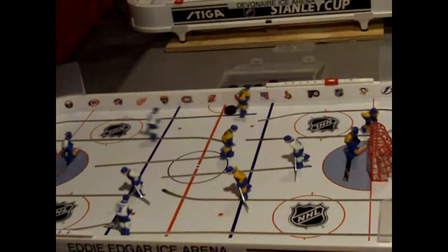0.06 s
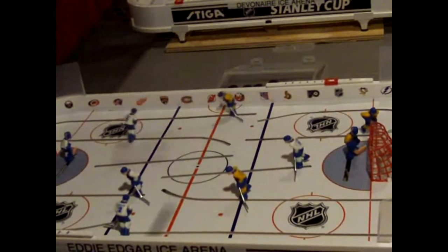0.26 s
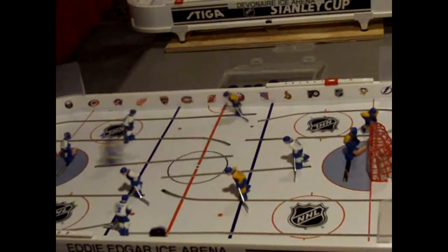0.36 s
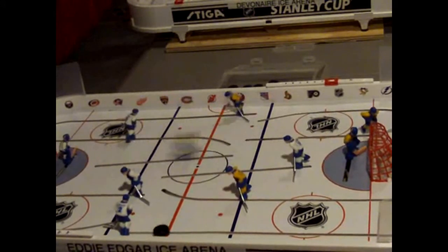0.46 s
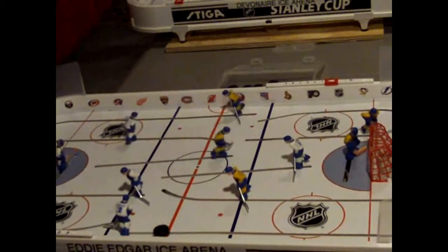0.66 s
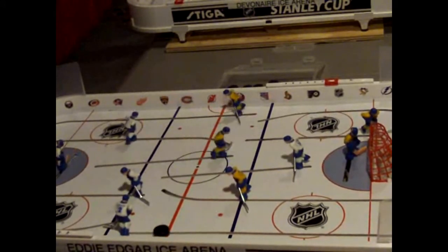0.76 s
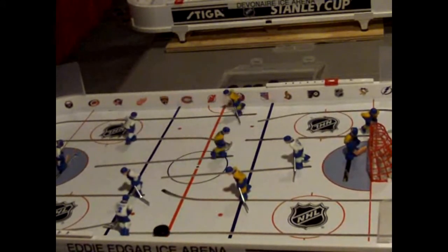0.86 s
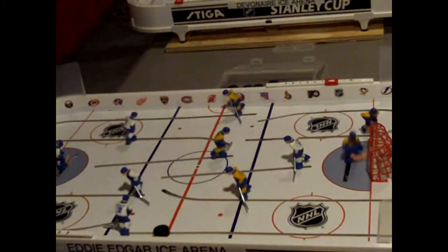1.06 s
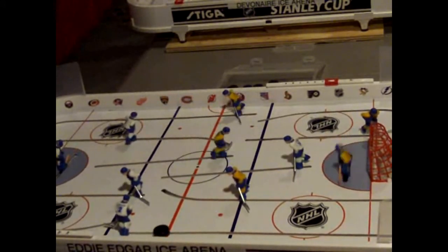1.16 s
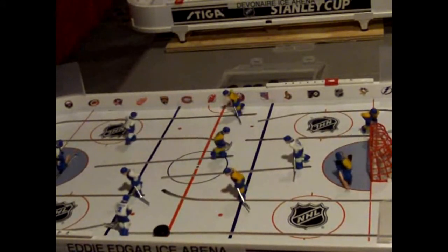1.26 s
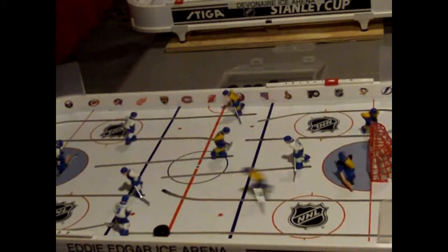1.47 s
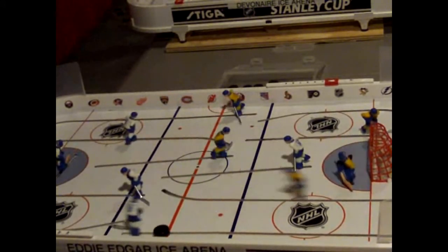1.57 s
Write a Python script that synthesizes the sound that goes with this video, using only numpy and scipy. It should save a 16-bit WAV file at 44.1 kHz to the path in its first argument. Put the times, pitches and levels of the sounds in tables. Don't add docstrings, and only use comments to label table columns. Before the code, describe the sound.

Hollow plastic knocks and rattling rods of a table hockey game build to an overloaded slam, then lighter ticks, another firm clatter and later clacks, with short indoor reverberation, soft hiss and thin, faint whine.

```python
import sys
import numpy as np
from scipy import signal
from scipy.fft import rfft, irfft
from scipy.io import wavfile

SR = 44100
rng = np.random.default_rng(int(sys.argv[2]) if len(sys.argv) > 2 else 0)


def decibels_to_gain(level_db):
    exponent = np.asarray(level_db, float) / 20
    return 10 ** exponent


def unload_wav(signal):
    wavfile.write(
        sys.argv[1],
        SR,
        np.round(np.clip(np.atleast_2d(signal).T, -1, 1) * 32767).astype(np.int16),
    )


N = 70560

# start in seconds, peak in dB, length of the drive in seconds.
SLAM = (.3121, 2.0, .009)


def rms_one(x):
    return x / np.sqrt(np.mean(x ** 2) + 1e-20)


def at_hz(points, hz):
    point_hz, point_db = np.transpose(points)
    return np.interp(np.log(hz), np.log(point_hz), point_db)


def ringing(hz, db, t60, phase, size):
    t = np.arange(size) / SR
    decay = np.exp(-np.log(1000) * t / t60[:, None])
    waves = np.sin(2 * np.pi * hz[:, None] * t + phase[:, None])
    return (decibels_to_gain(db)[:, None] * decay * waves).sum(axis=0)


def rink(treble_db, bass_db, count=56, size=4000):
    # frequency in Hz, level in dB.
    rink_colour = [(150, -63), (250, -39), (450, -8), (1410, -2.5), (2570, -7), (3060, -13), (4550, -19),
                   (9560, -30), (15500, -45)]
    treble_hz, bass_hz = 4000, 800
    ring_s_at_1k, ring_slope, mode_spread_db = 0.097, 0.37, 3.5
    shell_hz, shell_t60_s, shell_db = 3294, 0.028, -0.3

    def colour(hz):
        treble = treble_db / (1 + (treble_hz / hz) ** 2)
        bass = bass_db / (1 + (hz / bass_hz) ** 2)
        return at_hz(rink_colour, hz) + treble + bass

    hz = 400 + (np.arange(count) + rng.random(count)) * shell_hz / count
    t60 = ring_s_at_1k * (1000 / hz) ** ring_slope
    db = colour(hz) - 10 * np.log10(t60) + mode_spread_db * rng.standard_normal(count)
    phase = np.pi * (rng.random(count) > .5)
    low = ringing(hz, db, t60, phase, size)

    f = np.arange(1, size // 2 + 2) * SR / size
    high_pass = 1 / np.sqrt(1 + (shell_hz / f) ** 12)
    dense = irfft(rfft(rng.standard_normal(size)) * decibels_to_gain(colour(f)) * high_pass, size)
    scale = np.sqrt(count * SR / shell_hz / shell_t60_s) / 2 * decibels_to_gain(shell_db + mode_spread_db)
    shell = scale * dense * decibels_to_gain(-60 * np.arange(size) / SR / shell_t60_s)
    return low, shell


def contacts(per_s, spread_db, size):
    strength = decibels_to_gain(spread_db * np.minimum(rng.exponential(1, size), 4.0))
    sign = rng.choice([-1, 1], size)
    return strength * sign * (rng.random(size) < per_s / SR)


def strike(s, db, length, body):
    t = np.arange(4000) / SR
    push = contacts(per_s=2500, spread_db=2.5, size=4000) * np.exp(-(t / max(length, .001)) ** 2)
    push[0] = 7.0
    sound = signal.fftconvolve(push, body)
    out, start = np.zeros(N + SR), int(s * SR)
    out[start:start + len(sound)] = decibels_to_gain(db) * sound / np.abs(sound).max()
    return out[:N]


def slides():
    # time in seconds, level in dB, treble in dB.
    slide_effort = [(0, -29.5, -0.5), (0.129, -45, -7), (.15, -37.5, 8), (.19, -32, 1), (0.209, -28, 6),
                    (.3, -25.5, 2.5), (.36, -29, 3.5), (.46, -39, 1), (.57, -43, 0.7), (.62, -30, -6.5),
                    (.74, -54.5, 4), (.9, -52, 0), (1.08, -48.5, 4), (1.19, -37.5, -1.7), (1.28, -36, 1.2),
                    (1.38, -38.5, 1.5), (1.47, -46.5, 5), (1.6, -43.5, 0.5)]
    places, grains_per_s, spread_db = 4, 2400, 3.6
    s, db, treble_db = np.transpose(slide_effort)
    t, low, high = np.arange(N) / SR, 0, 0
    for _ in range(places):
        grains = contacts(grains_per_s / places, spread_db, N)
        body, shell = rink(0.11, 0.11)
        low = low + signal.fftconvolve(grains, body)[:N]
        high = high + signal.fftconvolve(grains, shell)[:N]
    bright = low + high * decibels_to_gain(np.interp(t, s, treble_db))
    return decibels_to_gain(np.interp(t, s, db)) * bright / low.std()


def hush():
    # frequency in Hz, level in dB per Hz.
    hush_colour = [(35, -58), (60, -31), (200, -20), (400, -8), (810, .1), (2010, -9.5), (5320, -14),
                   (15500, -33)]
    hz = np.maximum(np.arange(N // 2 + 1) * SR / N, 20)
    noise = irfft(rfft(rng.standard_normal(N)) * decibels_to_gain(at_hz(hush_colour, hz)), N)
    return decibels_to_gain(-52.5) * rms_one(noise)


def whine():
    whine_hz, whine_db, phase_jump = 7837.2, -65, -2.4
    frames_per_s, frame_start_s = 60, .0052
    tick_gain, tick_s, tick_drop_hz = 3.5, .0007, 200
    t = np.arange(N) / SR
    turn = (t - frame_start_s) * frames_per_s % 1
    since = turn / frames_per_s
    steady = np.exp(1j * phase_jump * (.5 - turn))
    tick = tick_gain * np.exp(-since / tick_s - 2j * np.pi * tick_drop_hz * since)
    carrier = np.exp(2j * np.pi * whine_hz * t)
    return decibels_to_gain(whine_db) * np.sqrt(2) * np.real((steady + tick) * carrier)


def knocks():
    # start in seconds, peak in dB, rattle length in seconds, treble in dB, bass in
    # dB.
    opening_knock = (.0002, -18, .025, -18, -18)
    # start in seconds, peak in dB, rattle length in seconds, treble in dB, bass in dB.
    firm_knocks = [(0.143, -24, .012, -17, 2), (.1915, -12.5, .005, 9, -5), (0.204, -13.5, .014, 8, 13),
                   (0.254, -16.5, 0.01, -21, 16), (.291, -13, .005, -5, 2), (.573, -18.5, 0.013, 11.5, -10),
                   (0.583, -11.5, 0.021, 5, 7.5), (0.601, -17.5, 0.032, -3, 10.5),
                   (0.798, -33, .01, -11, -13), (.927, -30, .01, -8, 4), (1.003, -19, .008, 3, -6),
                   (1.086, -24, 0.014, -12.5, -2.5), (1.234, -11, .026, -2, -10),
                   (1.26, -18.5, 0.03, -13, -18), (1.311, -21, 0.02, -13, -7), (1.392, -22, .02, 4, -4)]
    # start in seconds, peak in dB, rattle length in seconds,
    # treble in dB, bass in dB.
    light_ticks = [(0.167, -24, .012, 21, -6), (0.24, -22.5, 0.0032, 25, 3), (0.3016, -20, .001, 16, -13),
                   (.436, -26, 0.017, 3, -7), (0.518, -30.5, 0.0057, 6, 1), (0.715, -31.5, 0.0032, 6, 7),
                   (.742, -33.5, 0.0035, 17, 9), (0.92, -39, 0.01, 24, -7), (.977, -32.5, 0.0095, 10, 4),
                   (1.128, -30, 0.012, -1, -6), (1.164, -29.5, .008, -3, -7), (1.454, -32, 0.011, -5, -4.5),
                   (1.499, -36, 0.0073, -3, .1)]
    out = np.zeros(N)
    for s, db, length, treble_db, bass_db in [opening_knock, *firm_knocks, *light_ticks]:
        low, shell = rink(treble_db, bass_db)
        out += strike(s, db, length, low + shell)
    return out


def notes():
    # start in seconds, frequency in Hz, level in dB, t60 in seconds.
    woken_modes = [(.002, 1383, -28, .1), (.002, 800, -30, .1), (.2, 997, -24, .12), (.257, 1380, -24, .08),
                   (.291, 1100, -18, .05), (.585, 3043, -24, .08), (.588, 1425, -22, .12),
                   (.6, 480, -30, .1), (1.004, 1720, -26, .05), (1.008, 670, -29, .1),
                   (1.004, 2295, -30, .07), (1.088, 1040, -29, .07), (1.125, 1870, -36, .1),
                   (1.236, 1373, -19, .16), (1.24, 1130, -24, .12), (1.238, 1720, -22, .13),
                   (1.234, 2369, -26, .12), (1.31, 750, -32, .15)]
    out, t = np.zeros(N + SR), np.arange(8000) / SR
    swell = 1 - np.exp(-t / .002)
    for s, hz, db, t60 in woken_modes:
        start = int(s * SR)
        out[start:start + len(t)] += decibels_to_gain(db - 60 * t / t60) * swell * np.sin(2 * np.pi * hz * t)
    return out[:N]


def slam():
    # frequency in Hz, level in dB, t60 in seconds.
    slam_modes = [(562, -22, 0.1), (861, -24, 0.15), (1160, -23, 0.078), (1386, -11, .12), (1430, -20, .24),
                  (1516, -15, .09), (1658, -8, .04), (1820, -15, .045), (1940, -19, .05), (2072, -17, .04),
                  (2250, -16, .04), (2395, -20, .04), (2552, -20, .04), (3025, -22, .045)]
    body_db, crack_db, crack_s = .8, -2.5, .015
    s, peak_db, length = SLAM
    t = np.maximum(np.arange(N) / SR - s, 0)
    free = np.maximum(t - length, 0)
    body = np.zeros(N)
    for hz, db, t60 in slam_modes:
        body += decibels_to_gain(db + body_db - 60 * free / t60) * np.sin(2 * np.pi * (hz * t + rng.random()))
    crack = strike(s, peak_db + crack_db, crack_s, sum(rink(13.0, -14)))
    return body * (1 - np.exp(-t / .0003)) + crack


def thump():
    thump_db, thump_hz = -52, 60
    t = np.maximum(np.arange(N) / SR - SLAM[0], 0)
    return decibels_to_gain(thump_db) * thump_hz * 6 * t * np.exp(-thump_hz * 3 * t)


def room(x):
    t60_s, wall_cut_hz = 0.26, 2700
    t = np.arange(SR // 2) / SR
    noise = rng.standard_normal(len(t)) * np.minimum(t / 0.021, 1)
    low = signal.sosfilt(signal.butter(1, wall_cut_hz, fs=SR, output="sos"), noise)
    tail = low * decibels_to_gain(-60 * t / t60_s) + (noise - low) * decibels_to_gain(-110 * t / t60_s)
    return signal.fftconvolve(x, tail / np.sqrt(np.sum(tail ** 2)))[:N]


def scene():
    play = knocks() + notes() + slam() + slides()
    in_room = play + decibels_to_gain(-15.5) * room(play)
    heard = signal.sosfilt(signal.butter(5, 400, "high", fs=SR, output="sos"), in_room)
    return (heard + thump() + hush() + whine())[None]


def top_cut(x):
    return signal.sosfilt(signal.butter(12, 16040, fs=SR, output="sos"), x)


def record(dry):
    clip_top, cutoff_hz = .98, 15500
    x = dry / (1 + np.abs(dry / clip_top) ** 8) ** (1 / 8)
    x = signal.sosfilt(signal.cheby2(20, 65, cutoff_hz + 150, fs=SR, output="sos"), x)
    return top_cut(x)


dry = scene()
out = record(dry)
unload_wav(out)
```